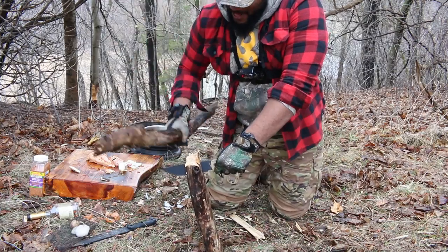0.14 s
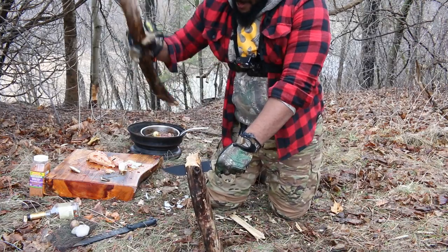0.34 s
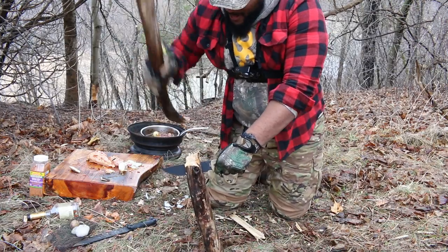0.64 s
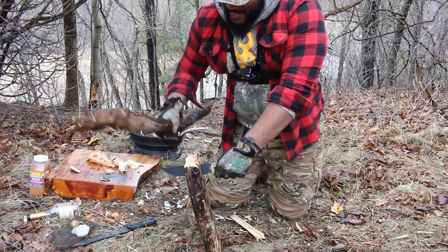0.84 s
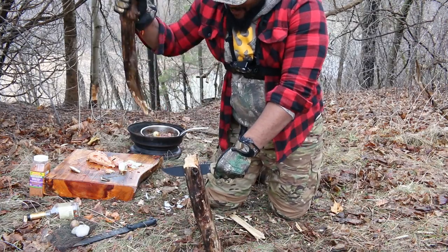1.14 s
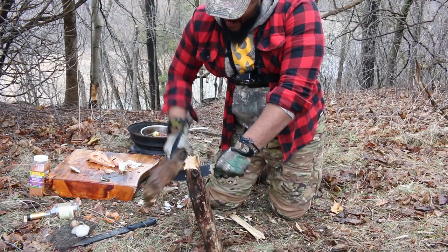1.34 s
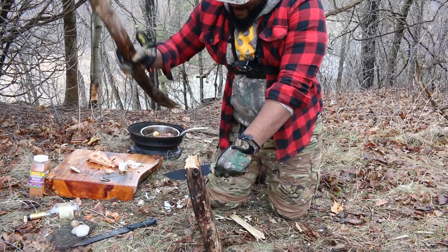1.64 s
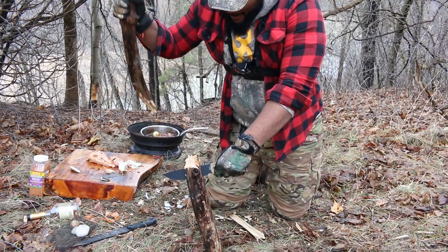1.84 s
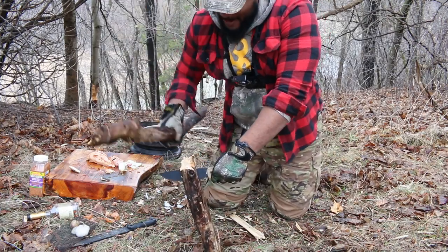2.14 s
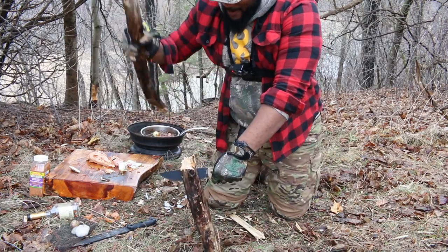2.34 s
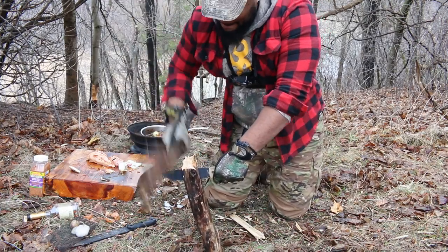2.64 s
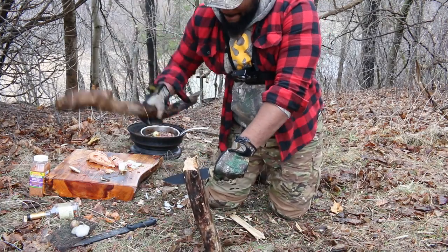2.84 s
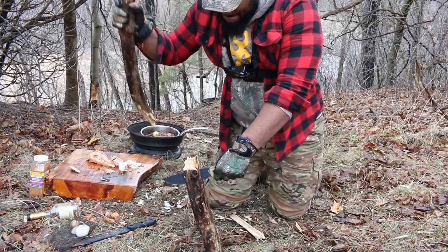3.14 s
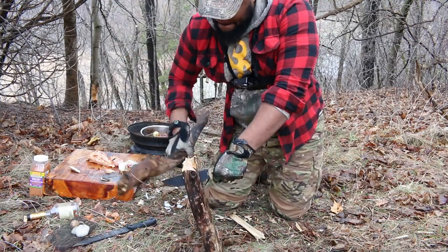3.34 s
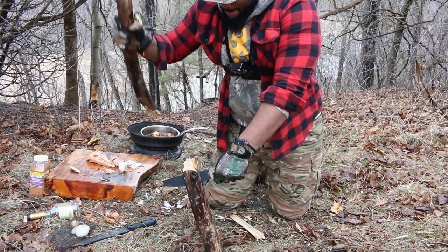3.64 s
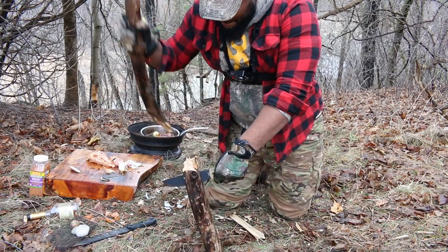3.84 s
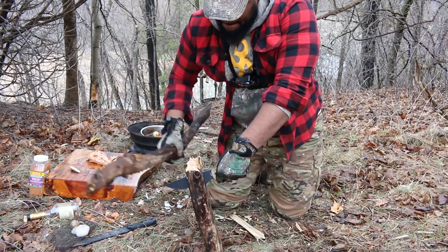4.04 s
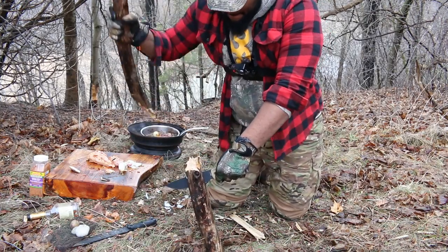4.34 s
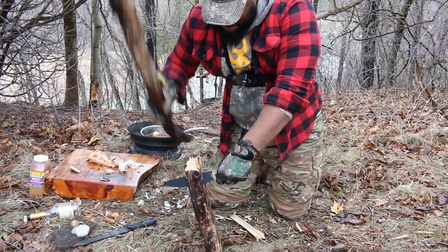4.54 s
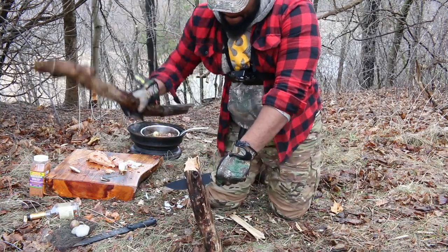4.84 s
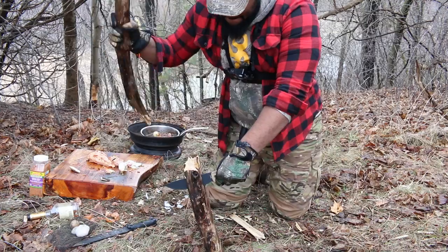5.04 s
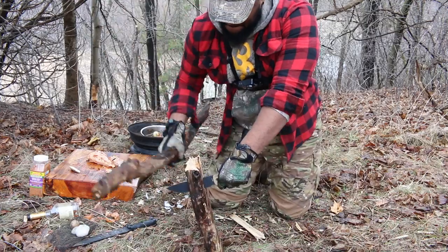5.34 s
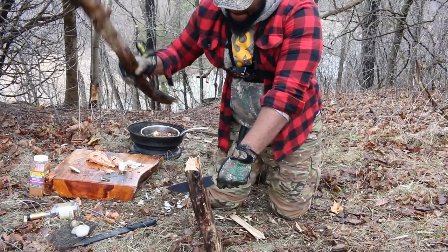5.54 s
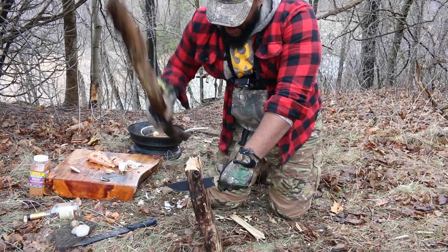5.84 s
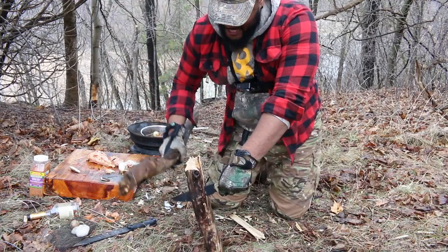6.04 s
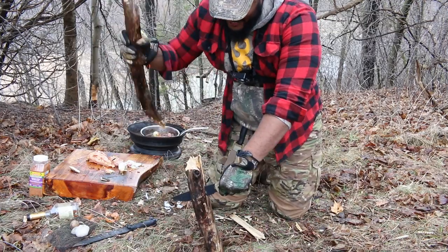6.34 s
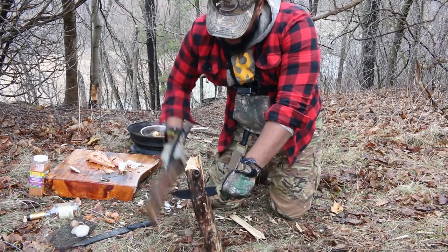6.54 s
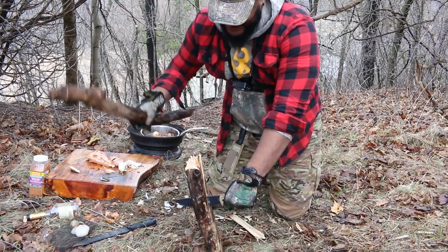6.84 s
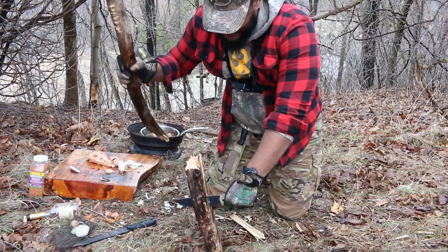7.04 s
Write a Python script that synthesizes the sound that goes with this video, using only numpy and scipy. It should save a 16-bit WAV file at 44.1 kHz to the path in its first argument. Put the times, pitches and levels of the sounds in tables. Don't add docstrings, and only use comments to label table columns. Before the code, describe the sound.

A wooden baton whacks a blade into a log at a steady pace outdoors, splitting fibres snapping late, while a pan faintly sizzles and pops.

```python
import sys
import numpy as np
from scipy import signal
from scipy.fft import rfft, irfft, next_fast_len
from scipy.io import wavfile
from scipy.ndimage import uniform_filter1d, minimum_filter1d

SR = 44100
rng = np.random.default_rng(int(sys.argv[2]) if len(sys.argv) > 2 else 0)


def bounce(signal):
    frames = np.transpose(np.atleast_2d(signal))
    limited = np.clip(frames, -1, 1)
    pcm = np.round(limited * 32767).astype(np.int16)
    wavfile.write(sys.argv[1], SR, pcm)


def invert_db(x):
    u = np.asarray(x, float) / 20
    return 10 ** u


N = 317079


def evened(x):
    return x / np.sqrt(np.mean(x ** 2) + 1e-20)


def read(points, hz):
    f, value = np.transpose(points)
    return np.interp(np.log(hz + 1), np.log(f + 1), value)


def add(mix, s, sound):
    part = mix[round(s * SR):][:len(sound)]
    part += sound[:len(part)]


def band(x, lo_hz, hi_hz):
    return signal.sosfilt(signal.butter(2, [lo_hz, hi_hz], "band", fs=SR, output="sos"), x)


def burst(hz, cycles):
    turns = np.arange(400) / SR * hz
    return np.sin(2 * np.pi * turns) * turns / cycles * np.exp(1 - turns / cycles)


def modes(table, t, sway_db, phase_spread, start_phase=0):
    level_sway = sway_db * rng.standard_normal(len(table))
    phases = start_phase + phase_spread * rng.standard_normal(len(table))
    rings = 0
    for (hz, db, t60), sway, phase in zip(table, level_sway, phases):
        rings = rings + invert_db(db + sway - 60 * t / t60) * np.sin(2 * np.pi * hz * t + phase)
    return rings


# pitch_ratio to the main ring, level_db, t60_s
BATON_MODES = [(0.423, -11.5, 0.045), (0.566, -0.5, 0.017), (0.856, 6, 0.022), (1, 7, 0.032),
               (1.244, 6, 0.019), (1.548, 1.5, 0.014)]
# pitch_hz, level_db, t60_s
LOG_MODES = [(1152, -7, .1), (1236, -12, .12), (1305, -16, .1), (1410, -16, .09)]


def wood_ring(t):
    main_ring_hz = 1068.6
    flip = np.pi * (np.arange(len(BATON_MODES)) % 2 == 0)
    baton = modes(np.array(BATON_MODES) * [main_ring_hz, 1, 1], t, 1.5, 0.3, flip)
    return baton + modes(LOG_MODES, t, 1, 0.5)


# pitch_hz, level_db, t60_s
BLADE_MODES = [(2150, -4, .014), (2400, -3, .014), (2850, -3, .016), (3350, -4, .014), (4300, -6, .018),
               (4800, -7, .018)]


def blade_crack(t):
    crack = evened(band(rng.standard_normal(len(t)), 2140, 3850))
    return modes(BLADE_MODES, t, 3, 2.5) + 0.35 * crack * invert_db(-60 * t / 0.036)


def splintering(t):
    grain = evened(band(rng.standard_normal(len(t)), 1700, 20000))
    return grain * (invert_db(-60 * t / 0.005) + invert_db(-19.5 - 60 * t / 0.039))


def ground_thump(t):
    push = 0.34 * t / 0.0013 * np.exp(1 - t / 0.0011)
    jump = 0.37 * np.sin(2 * np.pi * 310 * t) * invert_db(-60 * t / 0.03)
    soil = 0.06 * np.sin(2 * np.pi * 105 * t) * (t / 0.025) ** 2 * np.exp(2 - 2 * t / 0.021)
    return push + jump + soil


def contact(blade_db):
    tick_db, tick_fade_s = -4.5, 0.0012
    edge = band(rng.standard_normal(400), 4700, 18200)
    tick = invert_db(tick_db) * edge * np.exp(-np.arange(400) / SR / tick_fade_s)
    ping = burst(2540, cycles=1.2)
    return invert_db(0.5 + 0.99 * blade_db) * (tick - ping)


# start_s, strength_db, blade_crack_db, splintering_db, ground_thump_db
BLOW_EVENTS = [(0.159, -2.5, 1.5, -24, -9.5), (0.818, -4.5, -1.5, -13.5, -7.5), (1.458, -5.5, 3.5, -48, -7),
               (2.116, -6.5, 6.5, -40, -1.5), (2.766, -5, 0, -19, -3.5), (3.408, -4.5, -1, -20.5, -24),
               (4.063, -3, -29, -17, -13.5), (4.708, -7, -2, -7, -7.5), (5.364, -5, 0.5, -11, -39),
               (6.01, -6, -11, -30, -8.5), (6.669, -10, -2.5, -22, -25)]


def blows():
    out, t = np.zeros(N), np.arange(6000) / SR
    rise = -np.minimum(t / 0.0004, 1)
    for s, db, blade_db, splinter_db, thump_db in BLOW_EVENTS:
        knock = wood_ring(t) + invert_db(blade_db) * blade_crack(t)
        knock += invert_db(splinter_db + 23) * splintering(t)
        knock += invert_db(thump_db + 2.5) * ground_thump(t)
        add(out, s + 0.00046, invert_db(db + 4.5) * rise * knock)
        add(out, s + 0.0005, contact(blade_db))
    return out


# start_s, peak_db, pitch_hz
SNAP_EVENTS = [(4.0599, -13.5, 3730), (4.0609, -3, 4900), (4.7106, -10.5, 4940), (5.3697, -2.5, 2300),
               (6.0129, -13, 4850), (6.0160, -11, 2470), (6.0224, -17, 3500), (6.0259, -8.5, 3200),
               (6.6697, -9.5, 4200), (6.6734, -4, 2230), (6.6764, 2, 4570), (6.6796, -14, 3000),
               (6.6805, -16, 4370), (6.6884, -5, 4560), (6.6908, -14, 2440)]


def snaps():
    rise_s, fade_s = 0.0004, 0.0013
    out, t = np.zeros(N), np.arange(400) / SR
    shape = np.minimum(t / rise_s, 1) * np.exp(-t / fade_s)
    for s, db, hz in SNAP_EVENTS:
        spray = rng.standard_normal(400)
        fibres = 0.46 * band(spray, 0.9 * hz, 1.51 * hz) + 0.84 * band(spray, 1330, 9900)
        add(out, s + 0.0004, invert_db(db + 15) * (0.45 * burst(hz, 0.96) + fibres * shape))
    return out


# start_s, peak_db, pitch_hz
HOLLOW_EVENTS = [
    (.160, -4.5, 232),
    (1.459, -13, 180),
    (2.767, -1.5, 507),
    (3.409, -6.5, 680),
    (4.0635, -10.5, 260),
    (6.6698, -0.5, 579),
]


def hollow_knocks():
    out, t = np.zeros(N), np.arange(6000) / SR
    for s, db, hz in HOLLOW_EVENTS:
        rise = np.minimum(t * hz * 4, 1)
        add(out, s, -invert_db(db) * np.cos(2 * np.pi * hz * t) * rise * invert_db(-60 * t / 0.02))
    return out


# pitch_hz, level_db
FIZZ_COLOUR = [(1500, -34), (2500, -1), (3800, 4), (5000, 8.5), (7000, 3), (8000, 11)]


def fizz(per_s=2500, spread_db=8.0, level_db=-48):
    clumps = invert_db(7.2 * evened(uniform_filter1d(rng.standard_normal(N), size=500)))
    bursting = rng.random(N) < clumps * per_s / SR
    size = invert_db(spread_db * np.minimum(rng.exponential(1, N), 3.5)) * bursting
    kind, out = rng.integers(0, 24, N), np.zeros(N)
    for k, hz in enumerate(np.geomspace(1500, 8000, num=24)):
        bubble = invert_db(read(FIZZ_COLOUR, hz)) * burst(hz, 1.7)
        out += signal.oaconvolve(size * (kind == k), bubble)[:N]
    return invert_db(level_db) * evened(out)


# start_s, peak_db, pitch_hz
POP_EVENTS = [(0.0747, -37, 2050), (0.5806, -28.5, 3600), (0.63, -32, 2028), (1.2318, -24, 4640),
              (1.266, -29, 3780), (1.3494, -27.5, 3830), (1.781, -26, 3560), (1.8095, -28.5, 2400),
              (2.7082, -31, 2950), (3.3648, -31, 1860), (3.596, -29.5, 1850), (2.3615, -35, 3000),
              (4.6295, -23.5, 1880), (4.8927, -26.5, 4190), (5.0183, -23, 4120), (5.099, -28, 3380),
              (5.252, -23, 7060), (6.3165, -29, 3400), (6.4274, -32, 2100), (6.9033, -30.5, 2400)]
# start_s, peak_db, pitch_hz
SPIT_EVENTS = [(0.6886, -34.5, 4040), (0.7375, -36, 3760), (1.036, -34, 4070), (1.3264, -31, 6400),
               (1.687, -22, 7060), (1.88, -32.5, 3370), (2.255, -30, 3600), (2.289, -35, 3870),
               (2.427, -29, 1700), (3.133, -31, 2240), (4.5777, -32.5, 3300), (4.6656, -29, 1960),
               (4.9613, -30.5, 3420), (5.004, -32, 2160), (5.627, -29, 4220), (5.6957, -33.5, 3700),
               (5.876, -28.5, 3540), (6.5713, -20.5, 3730), (7.0676, -30, 3570)]


def pops_and_spits():
    out, t = np.zeros(N), np.arange(400) / SR
    for events, spray_db in ((POP_EVENTS, -22), (SPIT_EVENTS, 5)):
        for s, db, hz in events:
            spray = rng.standard_normal(400)
            droplets = invert_db(spray_db) * band(spray, 2700, 13500) * np.exp(-t / 0.0019)
            pan = 0.59 * band(spray[::-1], 0.84 * hz, 1.54 * hz) * np.exp(-t / 0.0069)
            add(out, s, invert_db(db + 1) * (burst(hz, 1.5) + droplets + pan))
    return out


# start_s, peak_db, pitch_hz
GURGLE_EVENTS = [
    (1.018, -20.5, 660),
    (1.133, -18, 640),
    (1.154, -24, 610),
    (2.974, -26, 332),
    (3.009, -34, 680),
    (3.159, -24, 710),
    (4.664, -46, 509),
    (5.314, -43, 590),
]


def gurgles():
    out, t = np.zeros(N), np.arange(1200) / SR
    for s, db, hz in GURGLE_EVENTS:
        swell = t / 0.009 * np.exp(1 - t / 0.0041)
        add(out, s, invert_db(db - 1.5) * np.sin(2 * np.pi * hz * t) * swell)
    return out


# pitch_hz, left_minus_right_db
NEAR_LEAN = [(200, 5.5), (800, 3), (2500, 2)]


def ports(x, lag, lean_db):
    lag_from_hz, case_db, case_hz = 1500, 1, 14000
    size = next_fast_len(N)
    hz = np.fft.rfftfreq(size, 1 / SR)
    share = 1 / (1 + (lag_from_hz / (hz + 1)) ** 6)
    turn = np.exp(-2j * np.pi * hz / SR * lag * share)
    scatter = rng.standard_normal((2, 60)) * np.exp(-np.arange(60) / 20)
    scatter = rfft(scatter / np.linalg.norm(scatter[0]), size)
    case = scatter * invert_db(case_db) * hz ** 2 / (hz ** 2 + case_hz ** 2)
    lean = invert_db((lean_db + read(NEAR_LEAN, hz)) / 2)
    return irfft(rfft(x, size) * (1 + case) * np.array([lean * turn, 1 / lean]), size)[:, :N]


# pitch_hz, t60_s
TREE_DECAY = [(100, 0.71), (600, 0.26), (1200, 0.51), (2000, 0.49), (4000, 0.44), (8000, 0.15),
              (12000, 0.056)]


def trees(x):
    taps = np.zeros((2, SR))
    at = np.arange(300, SR - 20, 20) + rng.integers(0, 20, (2, (SR - 301) // 20))
    np.put_along_axis(taps, at, rng.choice([-1., 1.], at.shape), 1)
    taps[1] = 0.64 * taps[0] + 0.56 * taps[1]
    hz, t, z = signal.stft(taps, SR, nperseg=256)
    fade = invert_db(-60 * t / read(TREE_DECAY, hz)[:, None])
    tail = signal.istft(z * fade, SR, nperseg=256)[1]
    return signal.fftconvolve(x[None], tail / np.linalg.norm(tail[0]), axes=1)[:, :N]


# pitch_hz, level_db per Hz
ROAD_COLOUR = [(12, -50), (43, -8.5), (86, -9.5), (127, -7.5), (178, -10), (332, -19.5), (600, -38)]
# pitch_hz, level_db per Hz
WATER_COLOUR = [(200, -45), (350, -13), (782, 0), (1160, -3), (1420, -6.5), (1990, -15), (2950, -32.5),
                (5000, -62)]
# pitch_hz, level_db per Hz
SPRAY_COLOUR = [(2200, -45), (3720, -20), (5640, -29.5), (7130, -21.5), (9500, -48.5), (12000, -30),
                (15600, -21), (15900, -60)]
# pitch_hz, likeness (1 = same)
WASH_LIKENESS = [(40, 0.21), (120, 0.79), (500, 0.69), (2000, 0.73), (4000, 0.58), (8000, 0.022),
                 (15000, 0.026)]
# pitch_hz, left_minus_right_db
WASH_LEAN = [(60, 4), (240, 1), (950, -4.5), (3770, 2), (15000, 1)]


def wash():
    frames, hz = N // 256 + 5, np.fft.rfftfreq(1024, 1 / SR)
    a, b, c, d, patches = rng.standard_normal((5, 513, frames))
    patches = uniform_filter1d(patches, size=10, axis=0)
    patches = evened(uniform_filter1d(patches, size=6, axis=1))
    same = np.clip(read(WASH_LIKENESS, hz), -1, 1)[:, None]
    left = a + 1j * b
    right = same * left + np.sqrt(1 - same ** 2) * (c + 1j * d)
    lean_db = np.array([.5, -.5])[:, None] * read(WASH_LEAN, hz)
    colour = invert_db(read(ROAD_COLOUR, hz)) + invert_db(read(WATER_COLOUR, hz)) + invert_db(read(SPRAY_COLOUR, hz))
    z = np.array([left, right]) * (colour * invert_db(lean_db))[..., None] * invert_db(1.32 * patches)
    air = evened(signal.istft(z, nperseg=1024, noverlap=768)[1][:, :N])
    hum = invert_db(-21) * evened(band(rng.standard_normal(N), 131.3, 137.3))
    return (air + hum) * invert_db(-34)


def scene():
    knocks = blows() + snaps() + hollow_knocks()
    pan = fizz() + pops_and_spits() + gurgles()
    near = ports(knocks, lag=-1.8, lean_db=0) + ports(pan, lag=-1.75, lean_db=0.5)
    return near + invert_db(-27) * trees(knocks) + wash()


def low_pass(x):
    return signal.sosfilt(signal.butter(12, 16490, fs=SR, output="sos"), x)


def record(dry):
    hold_s, recover_db_per_s, mic_top_hz = 0.08, 282, 8260
    power_db = 10 * np.log10(abs(uniform_filter1d((dry ** 2).mean(0), size=100)) + 1e-12)
    hold = round(hold_s * SR) // 2 * 2 + 1
    held_db = -minimum_filter1d(-np.minimum(power_db, -4), size=hold, origin=hold // 2, mode="nearest")
    fall = np.arange(N) * recover_db_per_s / SR
    recovering_db = np.maximum.accumulate(held_db + fall) - fall
    over_db = 0.69 * np.maximum(recovering_db + 21.5, 0)
    quick, slow = np.exp(-1 / (0.0048 * SR)), np.exp(-1 / (0.1 * SR))
    cut_db = signal.lfilter([1 - quick], [1, -quick], over_db)
    cut_db += 0.49 * signal.lfilter([1 - slow], [1, -slow], over_db)
    preamp = invert_db(-52) * band(rng.standard_normal(dry.shape), 1500, 15000)
    driven = dry / invert_db(cut_db) + preamp
    clipped = driven / (1 + abs(driven) ** 7) ** (1 / 7)
    rounded = signal.sosfilt(signal.butter(2, mic_top_hz, fs=SR, output="sos"), clipped)
    steady = signal.sosfilt(signal.butter(1, 20, "high", fs=SR, output="sos"), rounded)
    mix = np.clip(steady, -1, 1)
    return low_pass(mix)


dry = scene()
out = record(dry)
bounce(out)
```